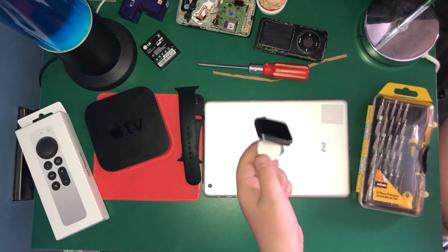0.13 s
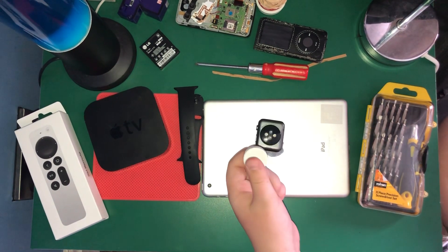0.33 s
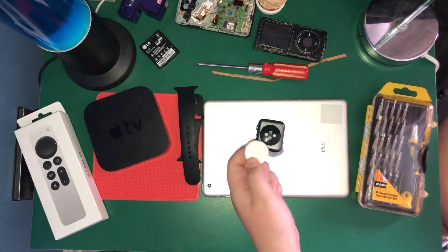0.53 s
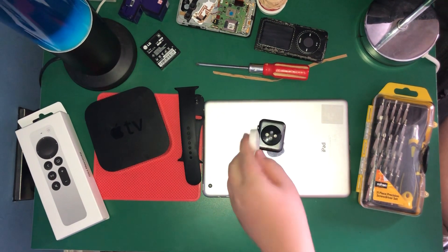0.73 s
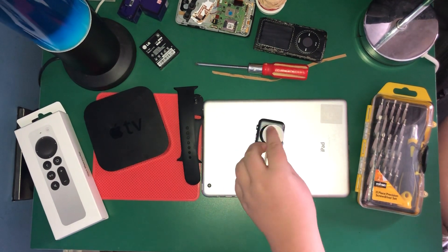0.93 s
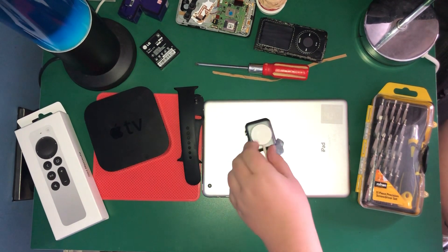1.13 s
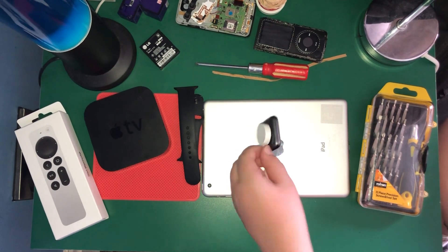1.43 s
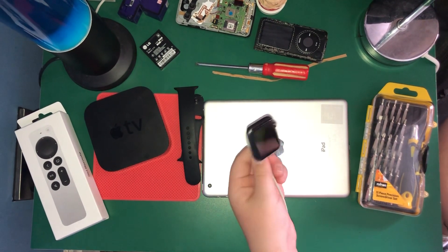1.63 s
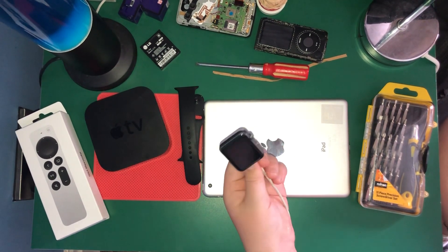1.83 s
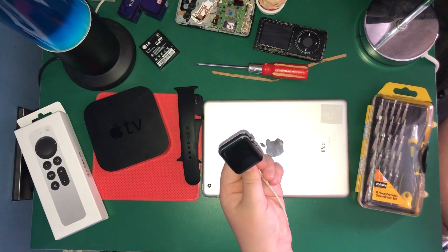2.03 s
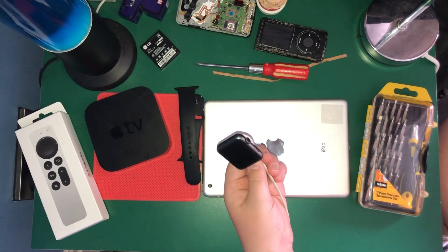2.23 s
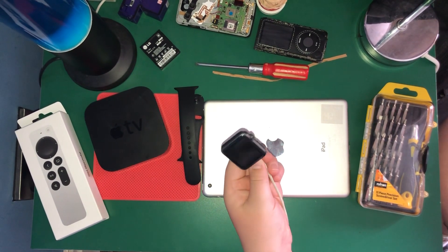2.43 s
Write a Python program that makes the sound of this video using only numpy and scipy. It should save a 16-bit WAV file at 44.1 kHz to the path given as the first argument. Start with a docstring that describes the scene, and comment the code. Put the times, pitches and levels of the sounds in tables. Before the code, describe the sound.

A small metal-and-glass watch clacks hard onto a slab on a desk at about 0.22 s, with a bright click and short dull thump, then rocks and lands again at 0.30 s, settling by 0.34 s. Near-quiet follows. Soft charger clicks come at 0.85 and 0.93 s, barely audible ticks from 1.1 s, and a faint click with a tiny scrape around 1.27 s. Dry small room, faint steady hiss to the end.

```python
"""A small metal-and-glass watch drops off its magnetic charger onto a slab on a desk, rocks and lands again;
later the charger puck taps its back, snaps on, and watch and puck scrape as they are lifted.
Each contact is a sum of damped case and glass modes with short noise; thumps ring the desk's low modes.
A small dead room answers with early reflections and a diffuse tail, over shaped-noise microphone hiss."""
import sys
import numpy as np
from scipy import signal
from scipy.fft import rfft, irfft
from scipy.io import wavfile

SR = 44100
rng = np.random.default_rng(int(sys.argv[2]) if len(sys.argv) > 2 else 0)


def gain_from_db(level_db):
    """Turn a decibel level (scalar or array-like) into a linear amplitude factor."""
    decades = np.asarray(level_db, float) / 20
    return 10 ** decades


def master(y):
    """Save y as 16-bit WAV."""
    cut = np.clip(np.atleast_2d(y).T, -1, 1)
    pcm = np.round(cut * 32767)  # scale
    wavfile.write(sys.argv[1], SR, pcm.astype(np.int16))


N = 114660  # length in samples

# Spectrum of the microphone noise: (frequency [Hz], relative level [dB])
HISS_SPECTRUM = [(4.7, -25), (8.0, -2), (18, 1), (54, -19), (82, -14.5), (181, -15.5), (264, -16),
                 (291, -16.5), (550, -19.5), (709, -20.5), (1670, -24.5), (14500, -31), (16000, -33)]
# Early reflections: (delay [s], level [dB])
REFLECTIONS = [(.0045, -19.5), (.009, -19), (.013, -19.5)]
# Diffuse room tail: (band centre [Hz], level [dB], t60 before the added sag [s])
ROOM_BANDS = [(150.7, -15, 0.29), (388, -10, 0.3), (1011, -8, .22), (2530, -13, .22), (5500, -11, .22),
              (9126, -11, 0.27), (14000, -7, 0.16)]
# Modes of slab and desk top: (frequency [Hz], relative level [dB], t60 [s])
DESK_MODES = [(135, -1.5, 0.21), (165, -4, .08), (202, -3, .1), (271.7, 1, .14), (343.3, 2, .08),
              (472.2, -1.5, 0.07753), (570, -1, 0.068), (673.3, 1, .05), (765, -4, 0.052), (938, -5, .04),
              (1129, -6, 0.023)]
# Modes of the metal case: (frequency [Hz], relative level [dB], t60 [s])
CASE_MODES = [(1450, -4.5, 0.0039), (1800, 3.5, 0.0095), (2293, 0, .01), (2805, -4, 0.011),
              (3275, -5, 0.016), (3770, -3, 0.0092), (4149, -1, .011), (4490, -4.5, .011),
              (4800, 0.5, 0.0068), (5520, -1.5, .01), (5840, -3, .01), (6540, -4.5, 0.012)]
# Modes of the glass: (frequency [Hz], relative level [dB], t60 [s])
GLASS_MODES = [(7070, -4, .005), (9000, -5, .006), (10300, -7, .005), (11300, 0.5, .008), (11900, -3, .008),
               (13056, -4, .006), (13974, -1, 0.0066), (15200, -4.5, .008)]
# Dull pushes into the desk:
# (time [s], level [dB], centre of the excited modes [Hz], rattle relative to level [dB])
DESK_THUDS = [(0.2168, -26, 279, 14.5), (0.2174, -27.5, 690, 7), (0.2467, -36.5, 495, 13),
              (0.3008, -31.5, 469.7, 13.5), (0.326, -40, 700, 5.5), (0.8447, -41.5, 330, 9.5),
              (.8455, -45.5, 850, 0.5), (0.931, -42, 278, 13.5), (0.9321, -50, 697, 8),
              (1.1058, -65.5, 329, 2), (1.1110, -62, 275.6, -5), (1.2690, -60, 350, 16.5)]
# Sharp contacts on the case:
# (time [s], level [dB], centre of the excited modes [Hz], width [octaves], treble relative to level [dB])
CASE_CLICKS = [(.2170, -11.5, 4430, 0.43, -15), (0.2176, -20, 3240, 1.13, -4),
               (.2258, -45.5, 3970, 1.3, -2), (0.238, -45, 4000, 0.52, -15),
               (0.2454, -27.5, 3000, 1.04, -8.5), (0.2999, -16.5, 4500, 0.79, -5),
               (.3011, -24.5, 2960, 0.75, 1), (0.3048, -25, 3680, 0.67, -9.5),
               (0.3084, -30.5, 5800, .5, -13), (.3240, -30.5, 4600, 0.27, -10),
               (.3370, -42, 2003, 1.3, -5.5), (0.8455, -37, 5560, 0.25, -24),
               (0.8479, -38, 5330, 0.15, -20.5), (0.9311, -46, 3460, 0.43, -20),
               (.9322, -35.5, 2980, 0.67, -15.5), (.9330, -35, 1800, 0.4, -20),
               (0.9399, -48.5, 3020, 0.44, -20.5), (1.1030, -61.5, 5500, 0.77, -8),
               (1.1332, -62, 4800, 0.43, -14), (1.2333, -66.5, 4493, 0.39, -8.5),
               (1.257, -61.5, 4200, .25, -26.5), (1.2678, -52, 4150, 0.28, -14),
               (1.2712, -45, 3900, 0.61, -11), (1.294, -56, 4300, 0.37, -18.5)]

HISS_DB = -68  # rms of the whole noise
MIC_LOW_HZ, TOP_HZ = 109.76, 16300
ROOM_RISE_S = 0.0052
ROOM_SAG_DB_PER_S2 = 500  # the tail dies faster as it goes
THUD_WIDTH_OCT, THUD_RISE_CYCLES, DESK_DETUNE, RATTLE_T60_S = 0.96, 1.2, 0.016, 0.05
CLICK_RISE_CYCLES, CASE_DETUNE, GLASS_RISE_S = 0.19, 0.03, 0.0012
CRACK_DB, CRACK_T60_S = -3, 0.018
HARD_DB = -43  # contacts above this start all case modes in step
SCRAPE_S, SCRAPE_TICKS, SCRAPE_RATE_PER_S = 1.273, 11, 550  # start, count, median-spacing rate
SCRAPE_DB, SCRAPE_SCATTER_DB, SCRAPE_FADE_DB_PER_S = -49, 2.5, -300
SCRAPE_HZ, SCRAPE_OCT, SCRAPE_TREBLE_DB = 4550, 0.46, -11.5


def hiss():
    """Stationary random noise: white noise weighted in frequency, with most density in the low rumble."""
    f = np.maximum(np.arange(N // 2 + 1) * SR / N, 1)
    hz, db = np.array(HISS_SPECTRUM).T
    weight = gain_from_db(np.interp(np.log(f), np.log(hz), db))
    noise = irfft(rfft(rng.standard_normal(N)) * weight, N)
    return noise * gain_from_db(HISS_DB) / noise.std()


def room(source):
    """Linear room response: convolution with direct sound, reflections and a tail decaying band by band."""
    t = np.arange(SR // 2) / SR
    response = np.zeros(len(t))
    response[0] = 1
    for delay, db in REFLECTIONS:
        response += gain_from_db(db) * np.sinc((t - delay) * SR)
    spectrum = rfft(rng.standard_normal(len(t)))
    f = np.maximum(np.arange(len(t) // 2 + 1) * SR / len(t), 1)
    centres = np.log([row[0] for row in ROOM_BANDS])
    for k, (_, db, t60) in enumerate(ROOM_BANDS):
        # overlapping bands, triangular in log frequency
        band = np.interp(np.log(f), centres, np.eye(len(centres))[k])
        rise = 1 - np.exp(-(t / ROOM_RISE_S) ** 2)
        envelope = gain_from_db(-60 * t / t60 - ROOM_SAG_DB_PER_S2 * t ** 2) * rise
        tail = irfft(spectrum * band, len(t)) * envelope
        response += gain_from_db(db) * tail / np.sqrt(np.sum(envelope ** 2))
    return signal.fftconvolve(source, response)[:N]


def ring(out, s, db, hz, t60, rise, detune, turn=1):
    """Modal superposition: damped sines, varied in strength and pitch; turn=-1 alternates their sign."""
    first = int(s * SR) + 1
    index = np.arange(first, min(first - 1 + SR // 3, N))
    t = (index / SR - s)[:, None]
    strength, pitch = rng.standard_normal((2, len(hz)))
    level = -gain_from_db(db + 2.0 * strength)
    sines = np.sin(2 * np.pi * hz * (1 + detune * pitch) * t)
    modes = level * sines * gain_from_db(-60 * t / t60) * (1 - np.exp(-t / rise))
    return out + np.bincount(index, modes @ turn ** np.arange(len(hz)), N)


def bell_db(hz, centre_hz, width):
    """Selective excitation: a contact drives modes near its centre most, 6 dB less at one width [octaves]."""
    return -6 * (np.log2(hz / centre_hz) / width) ** 2


def burst(out, s, db, centre_hz, width, t60):
    """High modal density: unresolved modes act as decaying noise, band-passed around the centre."""
    t = np.arange(SR // 8) / SR
    noise = rng.standard_normal(len(t)) * gain_from_db(db - 60 * t / t60)
    edges = [centre_hz / 2 ** width, min(centre_hz * 2 ** width, SR / 2.2)]
    noise = signal.lfilter(*signal.butter(2, edges, "band", fs=SR), noise)
    return out + np.bincount(int(s * SR) + 1 + np.arange(len(t)), noise, N)


def desk():
    """Impact on a plate: each push rings the low modes of slab and desk top and rattles in a noise band."""
    out = np.zeros(N)
    hz, gain, t60 = np.array(DESK_MODES).T
    for s, db, centre_hz, rattle_db in DESK_THUDS:
        level = db + gain + bell_db(hz, centre_hz, THUD_WIDTH_OCT)
        out = ring(out, s, level, hz, t60, THUD_RISE_CYCLES / hz, DESK_DETUNE, -1)
        out = burst(out, s, db + rattle_db, 2.2 * centre_hz, 0.7975, RATTLE_T60_S)
    return out


def click(out, s, db, centre_hz, width, treble_db):
    """Time-bandwidth reciprocity: a narrow contact swells slowly as case, glass and noise cracks sound."""
    rise = CLICK_RISE_CYCLES / (centre_hz * width)
    hz, gain, t60 = np.array(CASE_MODES).T
    turn = 1 if db > HARD_DB else -1
    out = ring(out, s, db + gain + bell_db(hz, centre_hz, width), hz, t60, rise, CASE_DETUNE, turn)
    hz, gain, t60 = np.array(GLASS_MODES).T
    out = ring(out, s, db + gain + treble_db, hz, t60, GLASS_RISE_S, CASE_DETUNE, -1)
    out = burst(out, s, db + treble_db + 4, 13000.0, 0.5, CRACK_T60_S)
    return burst(out, s, db + CRACK_DB, centre_hz, width, CRACK_T60_S)


def scrape(out):
    """Friction as a train of impacts: dense, unevenly spaced ticks of puck on case that fade."""
    spacing, scatter = rng.standard_normal((SCRAPE_TICKS, 2)).T
    delays = np.cumsum(np.exp(0.4 * spacing)) / SCRAPE_RATE_PER_S
    levels = SCRAPE_DB + SCRAPE_SCATTER_DB * scatter + SCRAPE_FADE_DB_PER_S * delays
    for delay, db in zip(delays, levels):
        out = click(out, SCRAPE_S + delay, db, SCRAPE_HZ, SCRAPE_OCT, SCRAPE_TREBLE_DB)
    return out


def watch():
    """Linear superposition: the separate contacts on the watch and the closing scrape add."""
    out = np.zeros(N)
    for contact in CASE_CLICKS:
        out = click(out, *contact)
    return scrape(out)


def scene():
    """Signal chain: contacts heard in the room lose their deep bass by high-pass, then hiss is added."""
    contacts = room(watch() + desk())
    high_pass = signal.butter(4, MIC_LOW_HZ, "high", fs=SR, output="sos")
    return (signal.sosfilt(high_pass, contacts) + hiss())[None]


def roll_off(x):
    """The treble ends steeply here."""
    return signal.sosfilt(signal.butter(12, 16870, fs=SR, output="sos"), x)


def record(dry):
    """Band limitation: a steep elliptic low-pass removes the top of the spectrum."""
    low_pass = signal.ellip(8, 0.2, 70, TOP_HZ, fs=SR, output="sos")
    mix = signal.sosfilt(low_pass, dry)
    return roll_off(mix)


dry = scene()
out = record(dry)
master(out)
```